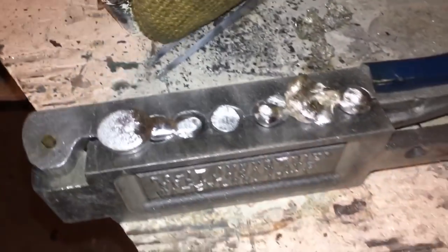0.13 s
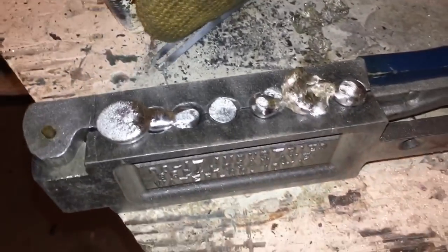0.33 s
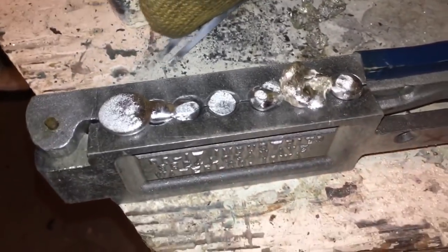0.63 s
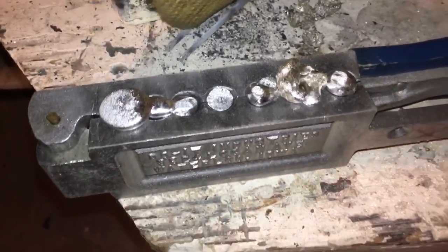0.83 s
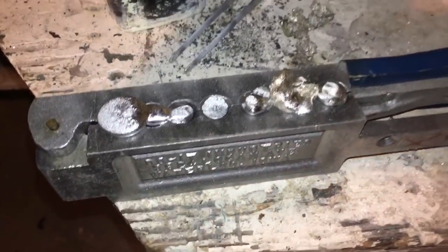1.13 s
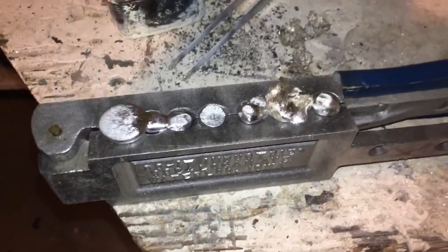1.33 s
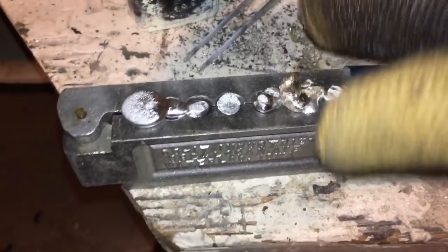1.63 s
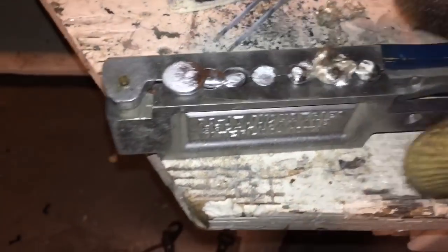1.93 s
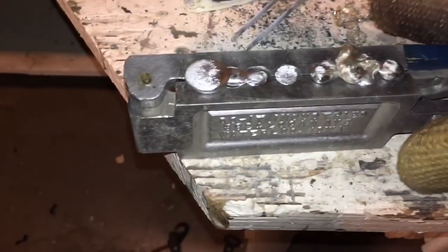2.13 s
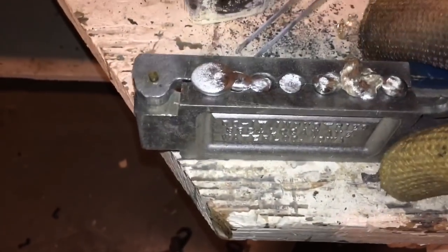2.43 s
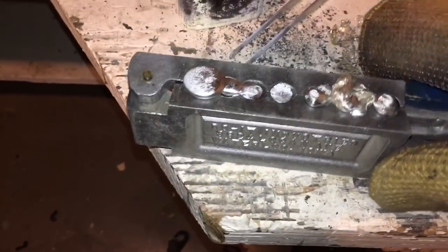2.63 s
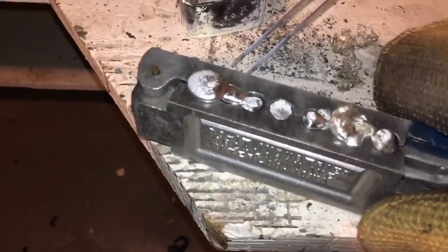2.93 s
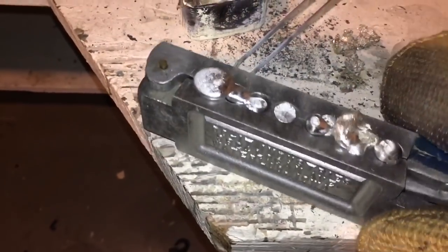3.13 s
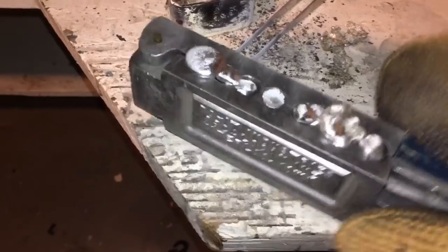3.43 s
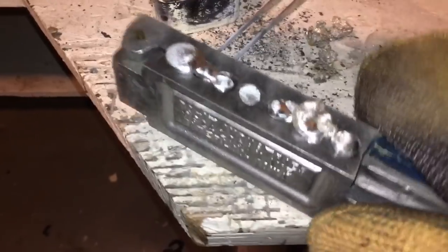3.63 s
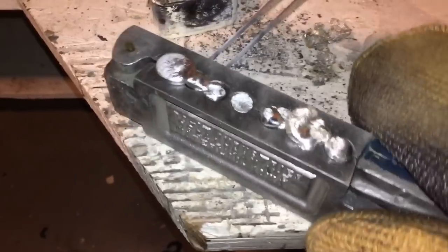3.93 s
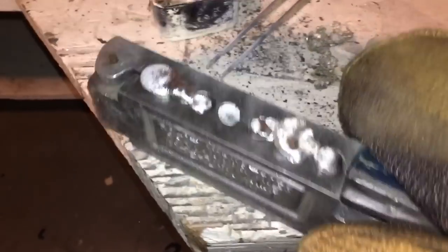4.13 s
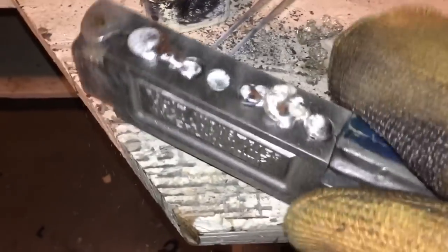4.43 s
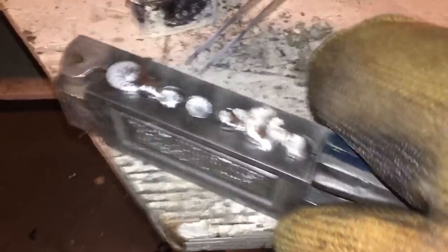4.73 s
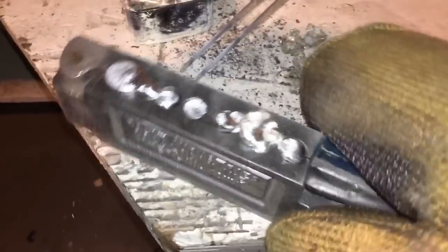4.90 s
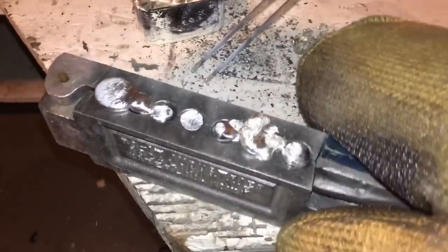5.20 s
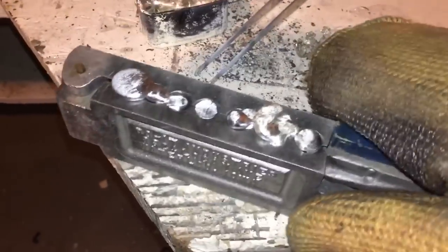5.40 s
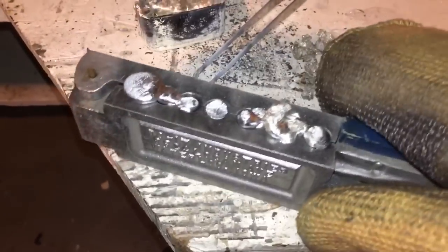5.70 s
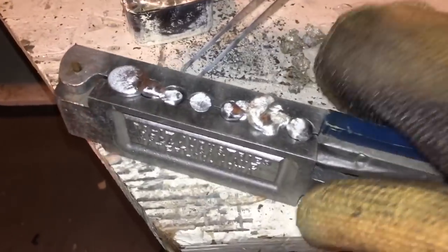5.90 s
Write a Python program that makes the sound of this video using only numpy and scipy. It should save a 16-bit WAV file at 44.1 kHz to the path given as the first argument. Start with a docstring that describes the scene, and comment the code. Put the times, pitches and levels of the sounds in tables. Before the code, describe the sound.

A metal mold is knocked quickly on a wooden workbench, booming and clicking, after two dull taps and a short scrape.

```python
"""In a small workshop, gloved hands knock a two-part metal casting mould on a wooden bench near a phone.
A tool is put down with two dull taps. The mould is dragged over the gritty top, knocked about five
times a second and left to settle. Each knock makes the wood boom while the metal halves click and
rattle. The walls echo, and under it all lie still air, a faint hum and the hand-held phone's rumble."""
import sys
import numpy as np
from scipy import signal
from scipy.fft import rfft, irfft
from scipy.io import wavfile
from scipy.ndimage import uniform_filter1d

SR = 44100
rng = np.random.default_rng(int(sys.argv[2]) if len(sys.argv) > 2 else 0)


def materialize(psi):
    """Save the field psi as 16-bit PCM at rate SR to the path in sys.argv[1].

    A 1-D psi becomes a single channel; in a 2-D psi each row is a channel.
    """
    bounded = np.clip(np.atleast_2d(psi).T, -1, 1)
    quanta = np.round(bounded * 32767).astype(np.int16)
    wavfile.write(sys.argv[1], SR, quanta)


N = 267157
AGE = np.arange(int(.7 * SR)) / SR  # seconds since a short sound began

# Tone colour (how strong each pitch is) of still air: f/Hz, level/dB
AIR_COLOUR = [(20, -29), (45, 5), (70, -4), (110, 2.5), (230, -4.5), (400, -15), (700, -14), (1100, -31.5),
              (1700, -19), (2400, -22.5), (3000, -30), (12000, -37.5), (16000, -46)]
# Tones of the mains hum: f/Hz, level/dB
HUM_TONES = [(120, -62.5), (180, -72.5), (240, -69), (359, -72)]
# The hand holding the phone shifts: t/s, length/s, level/dB
HAND_SHIFTS = [(0, .22, -49), (0.814, 0.13, -47), (1.72, 0.29, -53), (5.173, 0.078, -46)]
# Tone colour of rubbing: f/Hz, level/dB
RUB_COLOUR = [(90, -11.5), (200, 3), (330, -9.5), (480, -18), (700, -16.5), (850, -15), (1150, -13),
              (1600, -12.5), (2600, -23), (3400, -22.5), (6000, -28), (9300, -31.5), (16000, -37.5)]
# Gloves rub as they put the tool down and take hold: t/s, level/dB
RUB_REACHING = [(0.0, -66.5), (0.276, -70.5), (0.792, -69), (1.216, -79), (1.45, -78.5), (1.726, -72.5),
                (1.95, -73.5)]
# The mould slides faster and faster, then stops: t/s, level/dB
RUB_DRAGGING = [(2.1, -70.5), (2.5, -65), (2.7, -59.5), (2.85, -58), (2.89, -67.5), (3.07, -67.5),
                (3.13, -72.5)]
# The grip rubs during and after the knocks: t/s, level/dB
RUB_GRIPPING = [(3.3, -79), (3.4, -66), (3.51, -68.5), (5.22, -66.5), (5.57, -60), (5.86, -69), (6.06, -75)]
# Short scuffs, low for metal on wood and high for cloth: t/s, length/s, level/dB, f/Hz
SHORT_SCUFFS = [(0, 0.14, -71, 11000), (.676, 0.019, -53, 1370), (.735, 0.041, -54.5, 1270),
                (0.65, 0.16, -73, 10190), (1.08, 0.017, -70, 9000), (1.167, 0.038, -71, 8333),
                (1.52, 0.13, -70, 10190), (1.782, .07, -73, 9259), (2.805, 0.038, -66, 9060),
                (5.555, 0.063, -54, 1840), (5.895, 0.023, -49.5, 1530), (5.89, 0.043, -64, 6600)]
# The tool touches the bench: t/s, force/dB, cut-off f/Hz, extra thud from its weight/dB
TOOL_TAPS = [(.036, -55.5, 350, 25), (0.2053, -27.5, 302, -3.5), (0.67, -50, 560, -5),
             (.762, -26.5, 292, 0.5), (0.771, -34.5, 236, 19), (.914, -49, 1260, 7.5),
             (1.075, -53.5, 775, -7)]
# Ringing tones of the bench's far end, under the tool: f/Hz, level/dB, ring time/s (to fall 60 dB)
FAR_END_TONES = [(123.6, -10.5, 0.65), (152.4, 5, 0.17), (260.4, -1.5, 0.24), (343, -13, 0.088),
                 (344.4, 9.5, 0.13), (457, -9.5, 0.17), (509, 2, 0.1), (605, -37, 0.2), (846, -1.5, 0.1),
                 (950, -8, 0.065), (1210, -16, 0.18), (1740, -14, 0.075)]
# Tone colour of the wood's many weak tones: f/Hz, level/dB
WOOD_COLOUR = [(40, -30), (70, -21.5), (95, -6), (170, -6.5), (340, 0.5), (470, -5.5), (620, -2), (950, -5),
               (1150, -11), (1600, -17.5), (2400, -28.5), (3200, -36.5), (4000, -52), (5000, -70)]
# How long those weak tones last: f/Hz, ring time/s
WOOD_RING_TIMES = [(80, 0.35), (400, 0.28), (1000, 0.17), (2500, 0.23)]
# Tone colour of metal hitting metal: f/Hz, level/dB
METAL_COLOUR = [(800, -20), (2000, 5.5), (2800, -10.5), (3700, -6), (5000, -8), (6000, -4), (6600, -11.5),
                (7700, -11), (9300, -11.5), (10400, -17.5), (13000, -14.5), (16000, -27)]
# Ringing tones of the mould halves: f/Hz, level/dB, ring time/s
MOULD_TONES = [(4340, -1.5, 0.045), (4870, -0.5, 0.034), (5770, 0, .04), (6120, -6.5, 0.033),
               (7650, 9.5, 0.012), (7740, 1.5, 0.055), (10900, -26.5, 0.039), (14700, -4.5, 0.044)]
# Crumbs and handles tick: t/s, level/dB, f/Hz, ring time/s
SMALL_TICKS = [(.055, -64, 2980, .04), (.345, -62, 2780, .05), (.447, -55, 644, .14),
               (.664, -51.5, 1260, 0.069), (.916, -61.5, 11000, 0.076), (1.368, -57.5, 2110, .06),
               (1.661, -53.5, 1470, 0.032), (1.663, -60, 2940, 0.13), (2.587, -54, 2680, .045),
               (5.458, -59, 2980, .04), (5.882, -54, 1780, 0.075)]
# The mould lands on the bench: t/s, force/dB, cut-off f/Hz (higher is harder), click level/dB
MOULD_KNOCKS = [(1.48, -52, 160, -85), (2.197, -54, 280, -80), (2.844, -40, 328, -66),
                (3.178, -21.5, 810, -35.5), (3.3783, -20.5, 1230, -30), (3.573, -19.5, 460, -36),
                (3.7574, -20, 524, -33.5), (3.9664, -17.5, 583, -28.5), (4.182, -18.5, 1480, -23.5),
                (4.3907, -17, 1520, -20), (4.597, -16.5, 1360, -22), (4.7934, -18.5, 520, -32),
                (4.9915, -17.5, 700, -31.5), (5.181, -17.5, 556, -34), (5.254, -27.5, 746, -47.5),
                (5.382, -36, 306, -65), (5.408, -38.5, 280, -62), (5.464, -37, 358, -58),
                (5.59, -43.5, 422, -58), (5.611, -38.5, 305, -65), (5.673, -38, 208, -60),
                (5.735, -44, 278, -60), (5.816, -40.5, 165, -88)]
# Ringing tones of the bench with the mould on it: f/Hz, level/dB, ring time/s
BENCH_TONES = [(74, -2, 0.2), (118.4, -11.5, 0.38), (159.8, 4, .14), (196, -12, 0.48), (205.2, -6, 0.45),
               (245.4, 0, 0.13), (309, 1.5, 0.15), (314, 7.5, 0.14), (354.5, 0, 0.14), (394, -20, 0.4),
               (438.3, -19.5, 0.52), (544, -10.5, 0.34), (577, -6, 0.24), (611, -12.5, 0.12),
               (638.4, -13.5, 0.48), (682, -13, 0.28), (719, -12.5, 0.43), (812.6, -1, 0.2),
               (897, 3, 0.036), (918.6, -10.5, 0.24), (983, -4.5, 0.032), (1036, -13, 0.14),
               (1158, -6, 0.046), (1340, -15.5, 0.09), (1505, -10, 0.12), (1648, -5, 0.033),
               (1794, -19, 0.15), (2106, -18, 0.14), (2449, -17, 0.11)]
# The halves spring apart and click shut again: t/s, level/dB
MOULD_REBOUNDS = [(3.262, -50.5), (3.778, -33.5), (4.6263, -28)]
# The hinge is struck: t/s, level/dB
HINGE_PINGS = [(3.583, -50), (3.974, -45), (4.2008, -46), (4.611, -35.5)]
# Ringing tones of the hinge: f/Hz, level/dB, ring time/s
HINGE_TONES = [(10200, -9.5, .03), (11060, 1, 0.057), (10800, 1.5, 0.037), (11310, 0, .04),
               (13100, -14.5, .03)]
# Tone colour of the echo from the walls: f/Hz, level/dB
ECHO_COLOUR = [(50, 8), (100, -8), (200, -4), (330, -4.5), (470, 3), (720, 0), (950, 2.5), (1400, 2.5),
               (3000, 5.5), (12000, 3.5)]
# How long the echo lasts: f/Hz, ring time/s
ECHO_RING_TIMES = [(80, 0.8), (400, 0.63), (900, 0.44), (2000, 0.27), (6000, 0.18), (14000, .14)]

# The wood's sound is split into four bands, from low to high: thud, body, bark and crack.
BAND_CENTRES_HZ, BAND_EDGES_HZ = np.array([150, 380, 850, 1600]), [240, 620, 1150]
HARD_TAP_DB, HARD_KNOCK_DB = [-18, 0, -4.5, 1.5], [-2, 2, 1.5, -2]  # the bands in a perfectly hard hit


def undb(db):
    """Turn decibels into a number to multiply by."""
    return 10 ** (np.asarray(db) / 20)


def level(x, db, span_s=None):
    """Set the average (rms) level, judged on the first span_s seconds if given."""
    head = x if span_s is None else x[:int(span_s * SR)]
    return x * undb(db) / np.sqrt(np.mean(head ** 2) + 1e-20)


def add(track, start_s, sound):
    """Mix a sound into the track."""
    i = max(int(start_s * SR), 0)
    track[i:i + len(sound)] += sound[:N - i]


def lookup(table, hz):
    """Read between the rows of a (frequency, value) table, spaced by octaves."""
    freqs, values = np.transpose(table)
    return np.interp(np.log(hz + 1e-9), np.log(freqs), values)


def noise(colour, size):
    """Noise with the given tone colour, at 0 dB."""
    gain = undb(lookup(colour, np.fft.rfftfreq(size, 1 / SR)))
    return level(irfft(rfft(rng.standard_normal(size)) * gain, size), 0)


def band(x, hz, kind, order=2):
    """Keep the lows, the highs or a band between two pitches."""
    return signal.sosfilt(signal.butter(order, hz, kind, fs=SR, output="sos"), x)


def hiss(hz, spread):
    """Noise from hz / spread up to hz * spread."""
    return band(rng.standard_normal(len(AGE)), [hz / spread, hz * spread], "band")


def fade(ring_s):
    """A fade that falls 60 dB in ring_s seconds."""
    return np.exp(-np.log(1000) * AGE / ring_s)


def swell(length_s, rise_s, fall_s):
    """Rise, hold until length_s, then die away."""
    return (1 - np.exp(-AGE / rise_s)) * np.exp(-np.maximum(AGE - length_s, 0) / fall_s)


def die_away(x, ring_times):
    """Let low and high pitches fade at their own speeds."""
    hz, spectrum = np.fft.rfftfreq(len(x), 1 / SR), rfft(x)
    centres, times = np.transpose(ring_times)
    shares = [lookup(np.c_[centres, one], hz) for one in np.eye(len(centres))]
    return sum(irfft(spectrum * share, len(x)) * fade(ring_s) for share, ring_s in zip(shares, times))


def wander(per_second):
    """A smooth random drift, about 1 in size."""
    step = int(SR / per_second)
    stairs = np.repeat(rng.standard_normal(N // step + 1), step)[:N]
    return level(uniform_filter1d(stairs, step), 0)


def ring(tones, scatter_db=3., detune=.006, in_step=.43):
    """Fading tones, most starting in step; each hit lands on a new spot and changes their mix."""
    out = np.zeros(len(AGE))
    for hz, db, ring_s in tones:
        level_luck, pitch_luck, sign_luck = rng.standard_normal(3)
        strength = np.sign(sign_luck + in_step) * undb(db + scatter_db * level_luck)
        out += strength * np.sin(2 * np.pi * hz * (1 + detune * pitch_luck) * AGE) * fade(ring_s)
    return out


def air_and_hum(air_db=-61):
    """Still air and a faint, wavering mains hum."""
    t = np.arange(N) / SR
    hum = sum(np.sqrt(2) * undb(db + .82 * wander(3.7)) * np.sin(2 * np.pi * hz * t)
              for hz, db in HUM_TONES)
    return level(noise(AIR_COLOUR, N), air_db) + hum


def rumble(size):
    """Deep noise from the phone's body, at 0 dB."""
    return level(band(rng.standard_normal(size), hz=[37.7, 68.], kind="band", order=3), 0)


def phone_rumble(rest_db=-59, drift_db=4.5, firm_jolt_db=-33.5, firm_force_db=-16.5):
    """The hand-held phone rumbles, more when the hand shifts or a knock jolts it."""
    out = rumble(N) * undb(rest_db + drift_db * wander(2.2))
    for start_s, length_s, db in HAND_SHIFTS:
        shift = rumble(len(AGE)) * swell(length_s, rise_s=.017, fall_s=.023)
        add(out, start_s, level(shift, db, length_s))
    for start_s, force_db, *_ in MOULD_KNOCKS:
        jolt_db = firm_jolt_db + 4.5 * (force_db - firm_force_db)  # light knocks shake it far less
        add(out, start_s, level(rumble(len(AGE)) * fade(ring_s=.21), jolt_db, span_s=.055))
    return out


def rubbing():
    """The gloves and the mould rub, catching on grit."""
    times, levels = np.vstack([RUB_REACHING, RUB_DRAGGING, RUB_GRIPPING]).T
    effort_db = np.interp(np.arange(N) / SR, times, levels)
    catches = undb(1.2 * wander(60) + 2.4 * wander(700))
    rub = noise(RUB_COLOUR, N) * catches
    treble = band(rub, [3000, 12000], "band")  # the tables give the level of this part
    return rub / np.std(treble) * undb(effort_db)


def scuffs():
    """Cloth or metal slips for a moment and hisses."""
    out = np.zeros(N)
    for start_s, length_s, db, hz in SHORT_SCUFFS:
        scuff = hiss(hz, spread=1.46) * swell(length_s, rise_s=.0039, fall_s=.013)
        add(out, start_s, level(scuff, db, length_s))
    return out


def band_levels(force_db, cutoff_hz, loss_db_per_octave=12.5):
    """Level of each of the four bands: a soft hit loses the pitches above its cut-off."""
    loss_db = loss_db_per_octave * np.log2(BAND_CENTRES_HZ / cutoff_hz)
    return force_db - 10 * np.log10(1 + undb(loss_db) ** 2)


def wood_boom(tones, bands_db, weak_db, rise_s, in_step):
    """Struck wood rings with a few strong tones over many weak ones, made here from noise."""
    weak = die_away(noise(WOOD_COLOUR, len(AGE)), WOOD_RING_TIMES)
    strong = ring(tones, scatter_db=2., detune=.0073, in_step=in_step)
    wood = level(strong, 0, span_s=.027) + level(weak, weak_db, span_s=.055)
    wood *= (1 - np.exp(-AGE / rise_s)) * (1 + .9 * fade(.07))  # loudest while the hit still presses
    wood = band(wood, 60., "high", order=4)  # a board gives off little deep bass
    parts = []
    for hz in BAND_EDGES_HZ:  # peel off the bands, lowest first
        parts.append(band(wood, hz, "low", order=4))
        wood = band(wood, hz, "high", order=4)
    return sum(level(part, db, span_s=.059) for part, db in zip(parts + [wood], bands_db))


def rattle(db, hold_s=.023, clink_db=-12):
    """Loose metal chatters in tiny hits that ring the mould halves, until the grip stills it."""
    hit_sizes = undb(-.5 * np.repeat(rng.standard_normal(len(AGE)), 48)[:len(AGE)])
    shape = (1 - np.exp(-AGE / .002)) / np.sqrt(1 + (AGE / hold_s) ** 6) * fade(.45)
    chatter = noise(METAL_COLOUR, len(AGE)) * hit_sizes * shape
    clink = signal.fftconvolve(chatter, ring(MOULD_TONES))[:len(AGE)]
    return level(level(chatter, 0) + level(clink, clink_db), db, span_s=.031)


def tool_taps():
    """A tool is put down further along the bench; its weight brings out the thud."""
    out = np.zeros(N)
    for start_s, force_db, cutoff_hz, weight_db in TOOL_TAPS:
        bands_db = band_levels(force_db, cutoff_hz) + HARD_TAP_DB
        bands_db[0] += weight_db
        boom = wood_boom(FAR_END_TONES, bands_db, weak_db=-11, rise_s=.00031, in_step=3.)
        add(out, start_s, boom + rattle(force_db - 42))
    return out


def ticks():
    """Crumbs and handles give small dry ticks as the grip shifts."""
    out = np.zeros(N)
    for start_s, db, hz, ring_s in SMALL_TICKS:
        add(out, start_s, level(hiss(hz, spread=1.28) * fade(ring_s), db, span_s=.0071))
    return out


def click(db):
    """Metal meets metal: a short crack and a faint ring from the clamped halves."""
    crack = level(noise(METAL_COLOUR, len(AGE)) * fade(ring_s=.011), db, span_s=.0026)
    return crack + level(ring(MOULD_TONES), db - 29, span_s=.009)


def mould_knocks(shut_delay_s=.001006, edge_lead_s=.005, click_share=.41):
    """The mould lands, the bench booms, and the halves click shut and rattle."""
    out = np.zeros(N)
    for start_s, force_db, cutoff_hz, click_db in MOULD_KNOCKS:
        bands_db = band_levels(force_db, cutoff_hz) + HARD_KNOCK_DB
        boom = wood_boom(BENCH_TONES, bands_db, weak_db=-6, rise_s=.00058, in_step=.6)
        rattle_db = (1 - click_share) * force_db + click_share * click_db - 18.5
        add(out, start_s, boom + rattle(rattle_db))
        shut_s = start_s + shut_delay_s
        add(out, shut_s - edge_lead_s, click(click_db - 14))  # one edge touches first
        add(out, shut_s, click(click_db))
    return out


def rebounds():
    """After some knocks the halves spring apart and click shut again."""
    out = np.zeros(N)
    for start_s, db in MOULD_REBOUNDS:
        add(out, start_s, click(db))
    return out


def hinge_pings():
    """After some knocks the struck hinge gives a short, high ring."""
    out = np.zeros(N)
    for start_s, db in HINGE_PINGS:
        add(out, start_s, level(ring(HINGE_TONES), db, span_s=.0054))
    return out


def room(x, echo_db=-11., gap_s=.0091):
    """The walls echo after a short gap; low pitches last longest."""
    echo = die_away(noise(ECHO_COLOUR, len(AGE)), ECHO_RING_TIMES)
    echo *= np.clip(AGE / gap_s - 1, 0, 1)
    echo /= np.sqrt(np.sum(band(echo, 1000., "low") ** 2) * SR / 2000)  # gain of about 1 below 1 kHz
    return x + undb(echo_db) * signal.fftconvolve(x, echo)[:N]


def scene():
    """Hits and scuffs echo in the room, over rubbing, rumble, air and hum, in one channel."""
    contacts = mould_knocks() + tool_taps() + rebounds() + hinge_pings() + ticks() + scuffs()
    return (room(contacts) + rubbing() + phone_rumble() + air_and_hum())[None]


def record(dry, top_hz=16300):
    """The phone rounds off the loudest peaks and cuts the highest treble."""
    rounded = dry / (1 + dry ** 8) ** (1 / 8)
    return signal.sosfilt(signal.ellip(8, .2, 80, top_hz, fs=SR, output="sos"), rounded)


dry = scene()
out = record(dry)
materialize(out)
```